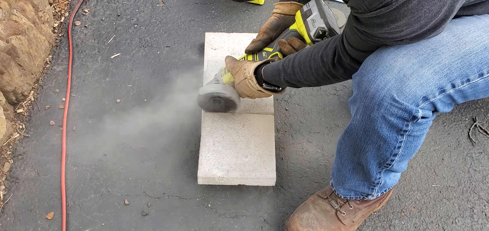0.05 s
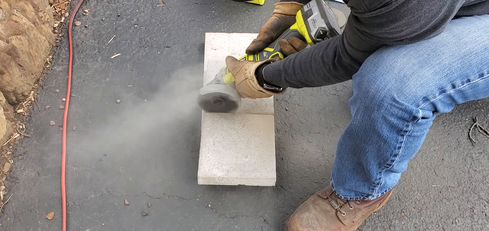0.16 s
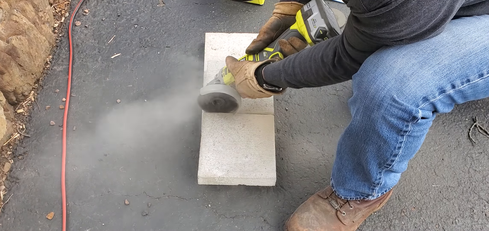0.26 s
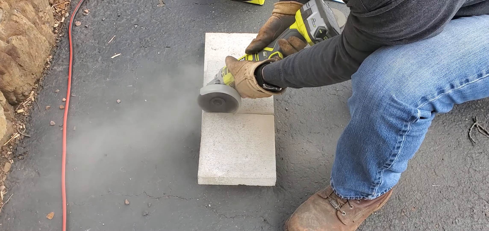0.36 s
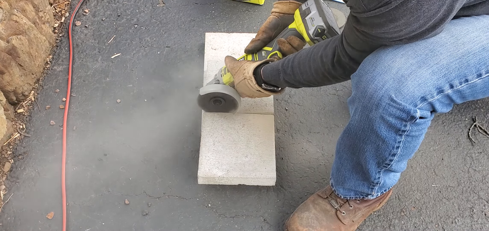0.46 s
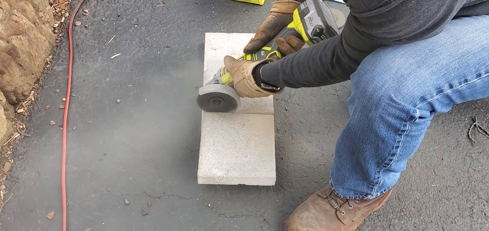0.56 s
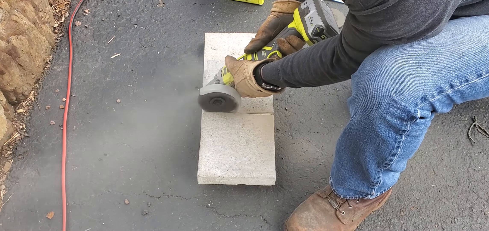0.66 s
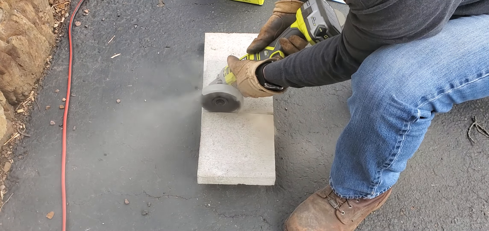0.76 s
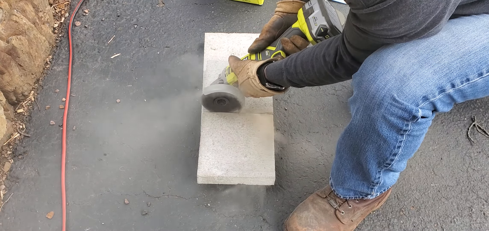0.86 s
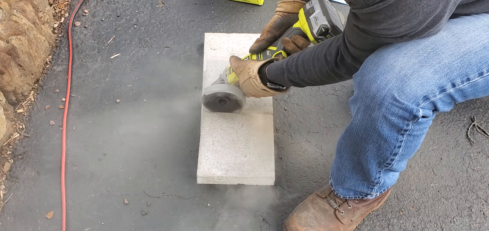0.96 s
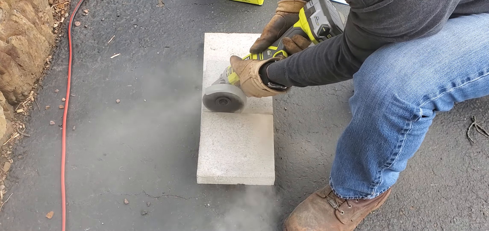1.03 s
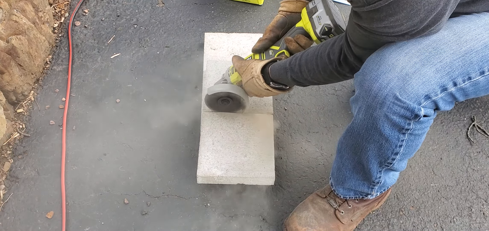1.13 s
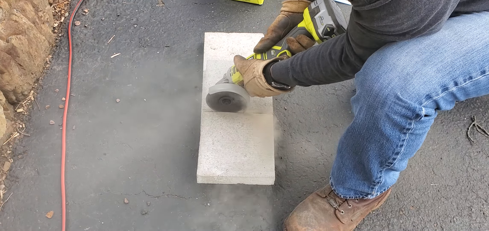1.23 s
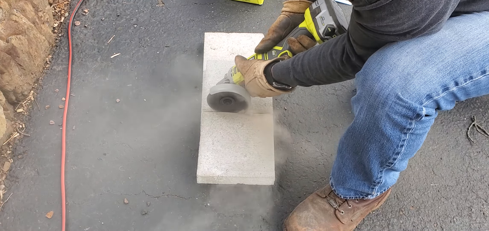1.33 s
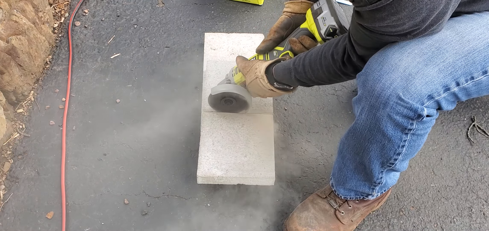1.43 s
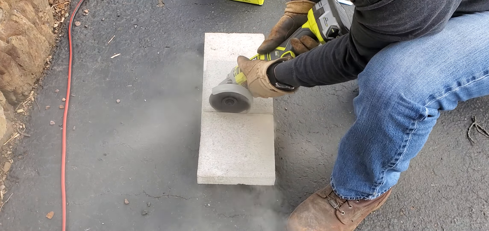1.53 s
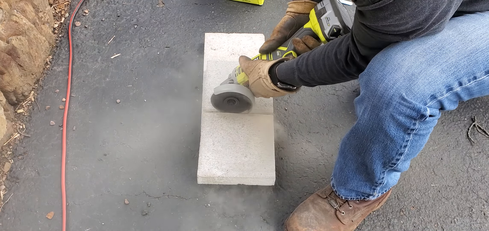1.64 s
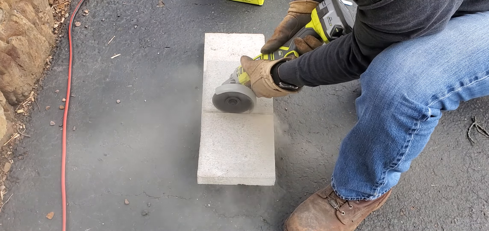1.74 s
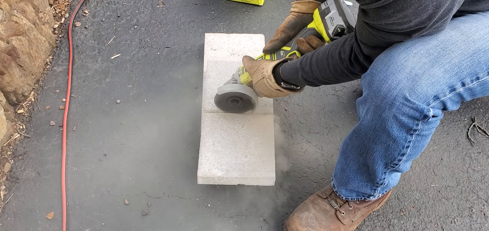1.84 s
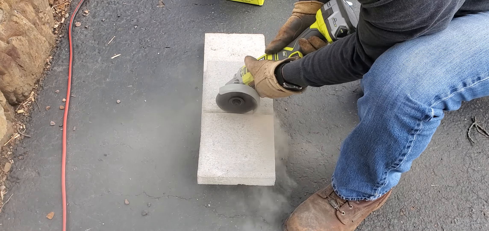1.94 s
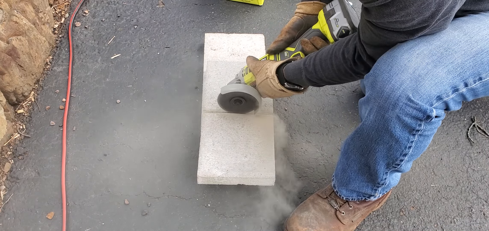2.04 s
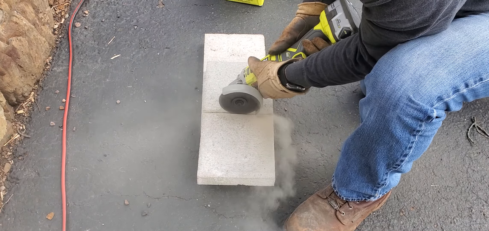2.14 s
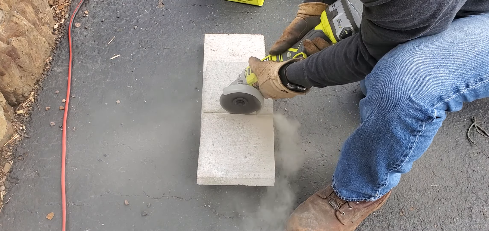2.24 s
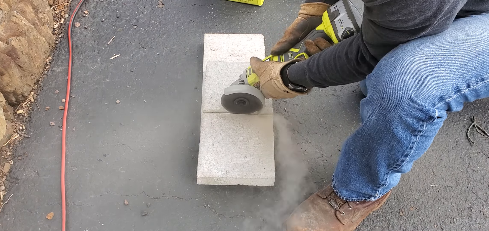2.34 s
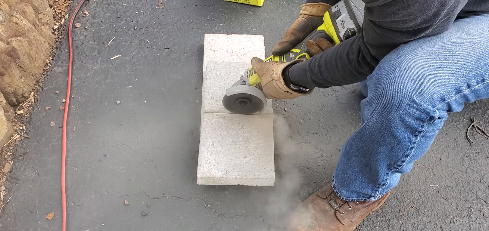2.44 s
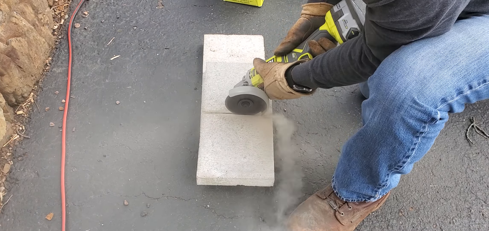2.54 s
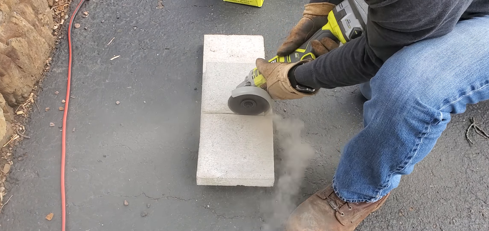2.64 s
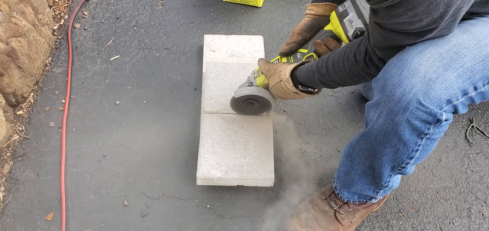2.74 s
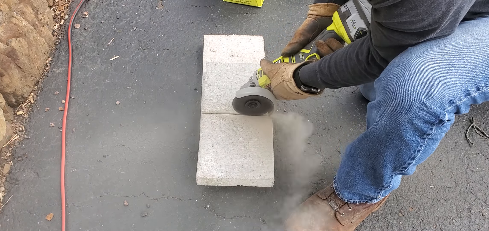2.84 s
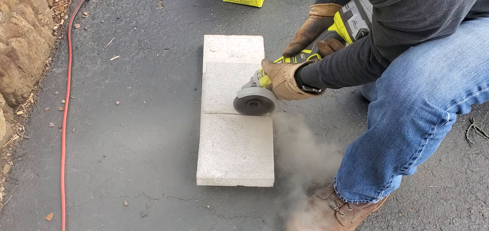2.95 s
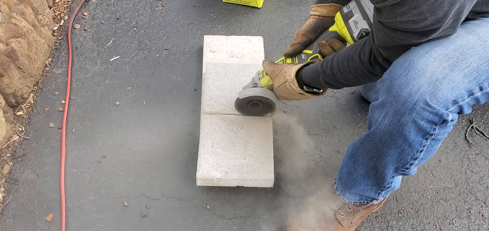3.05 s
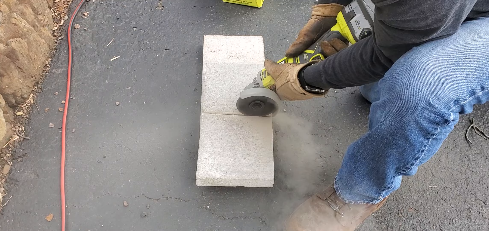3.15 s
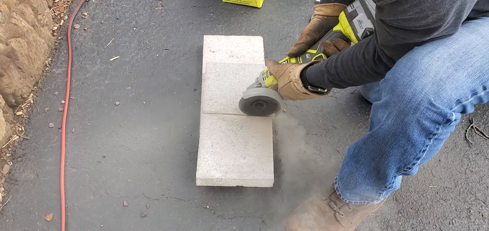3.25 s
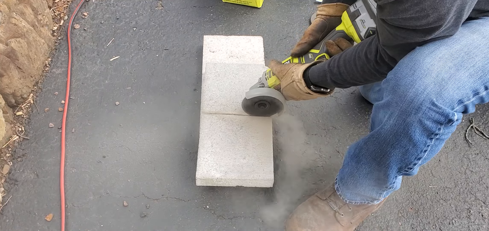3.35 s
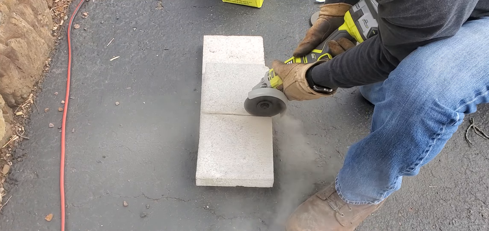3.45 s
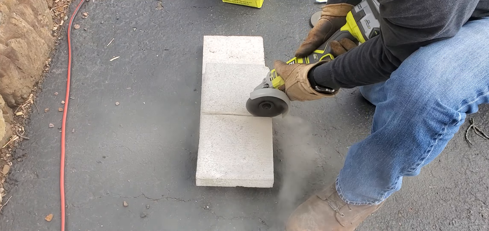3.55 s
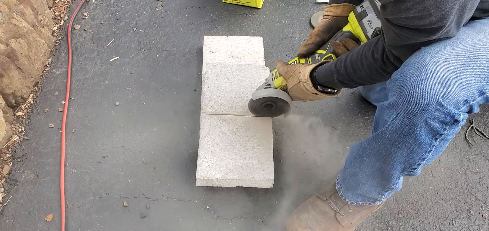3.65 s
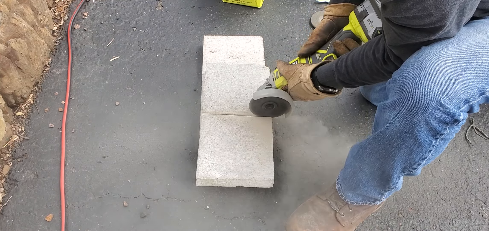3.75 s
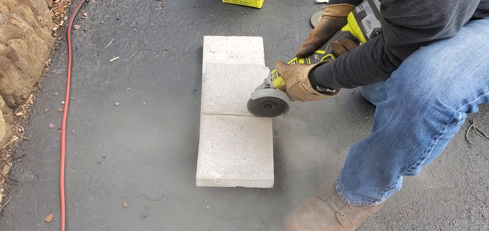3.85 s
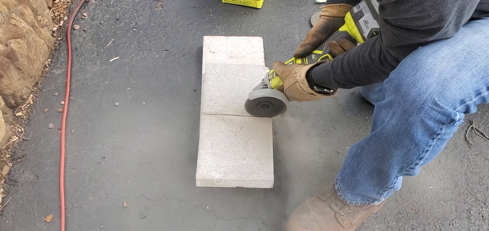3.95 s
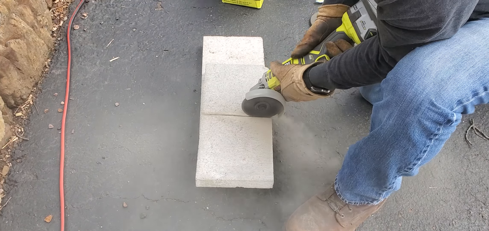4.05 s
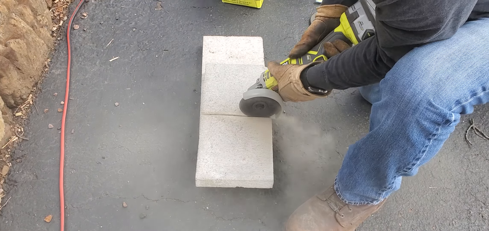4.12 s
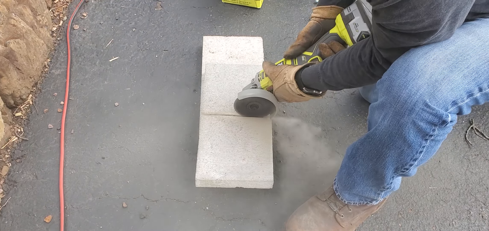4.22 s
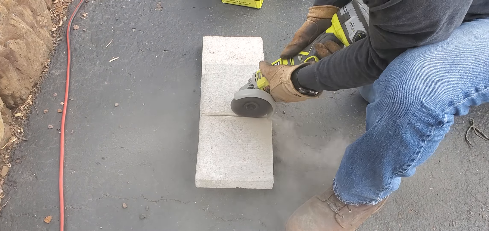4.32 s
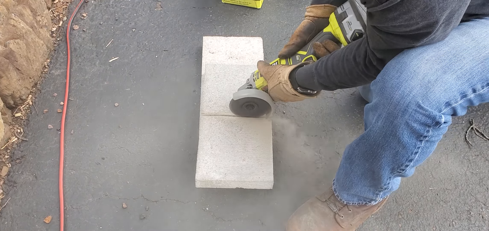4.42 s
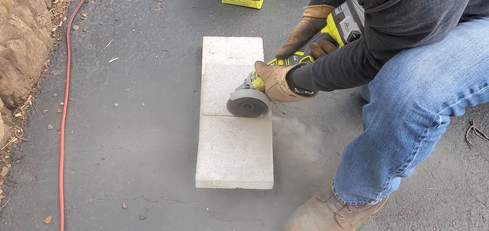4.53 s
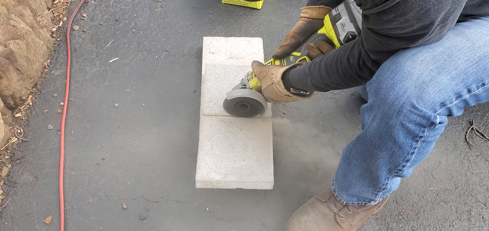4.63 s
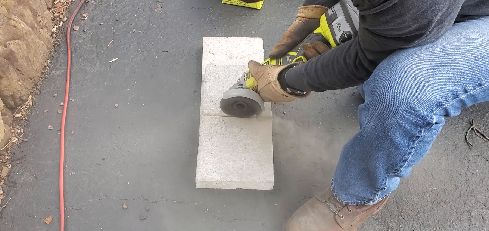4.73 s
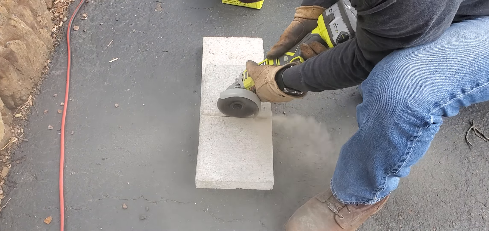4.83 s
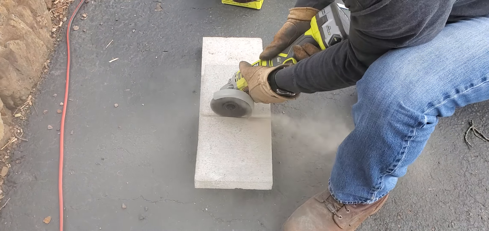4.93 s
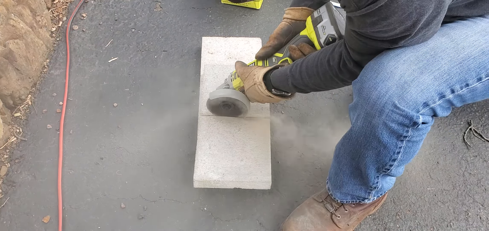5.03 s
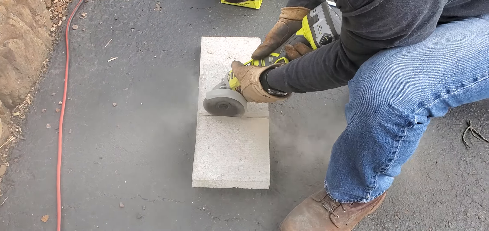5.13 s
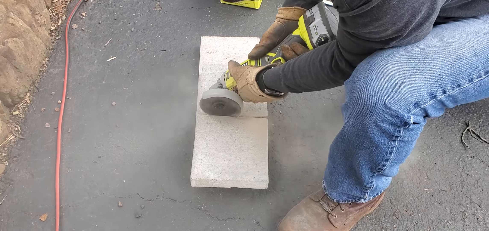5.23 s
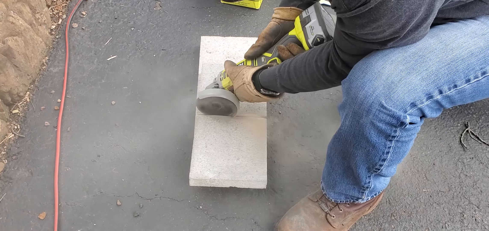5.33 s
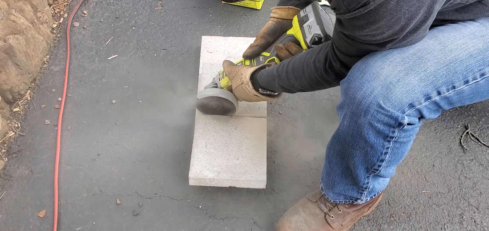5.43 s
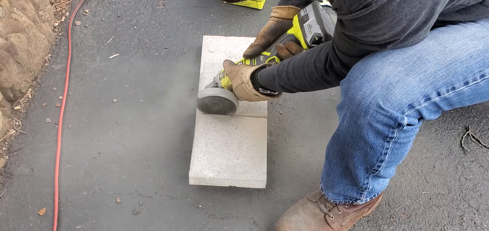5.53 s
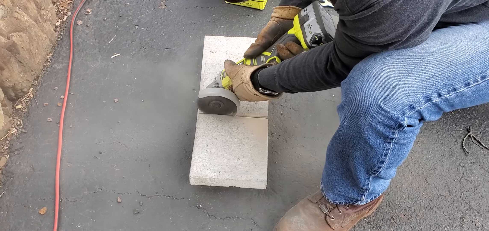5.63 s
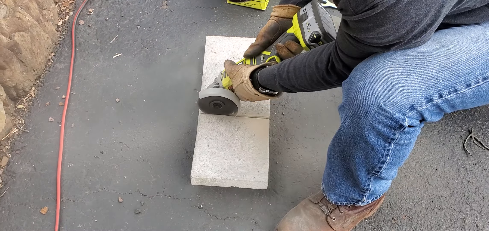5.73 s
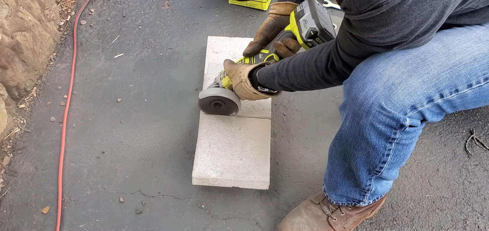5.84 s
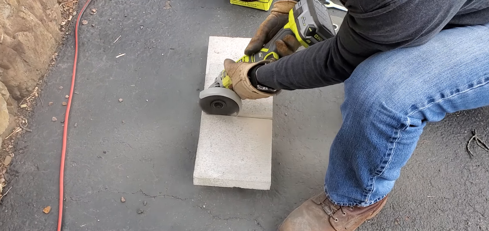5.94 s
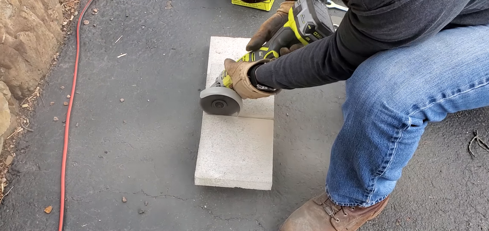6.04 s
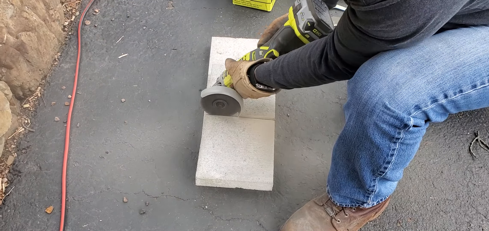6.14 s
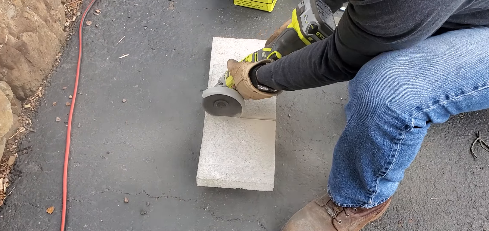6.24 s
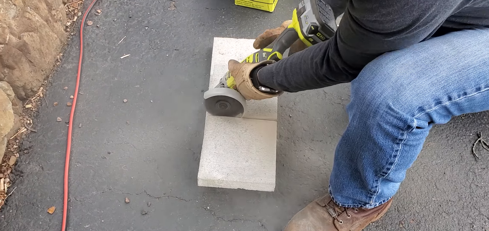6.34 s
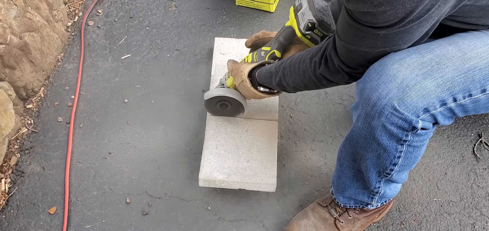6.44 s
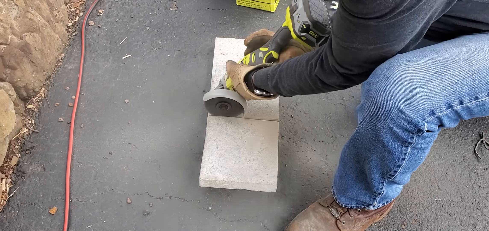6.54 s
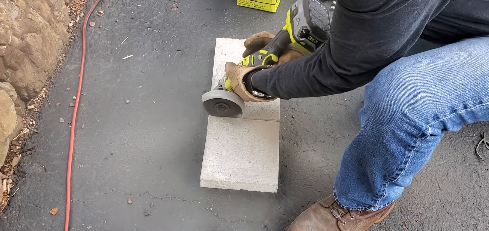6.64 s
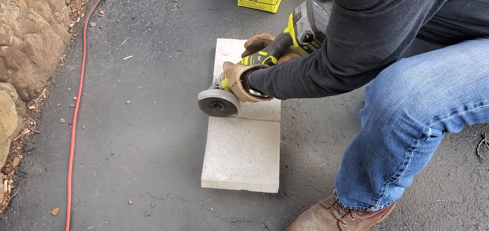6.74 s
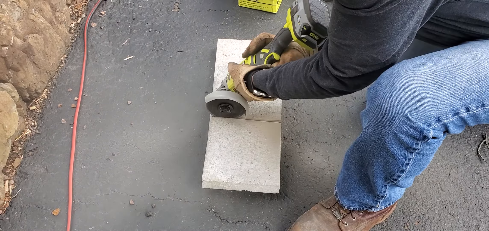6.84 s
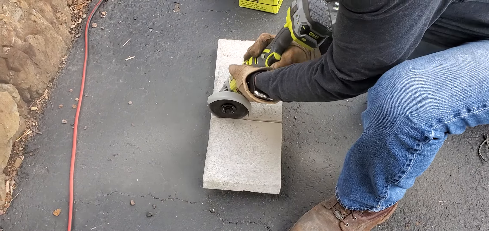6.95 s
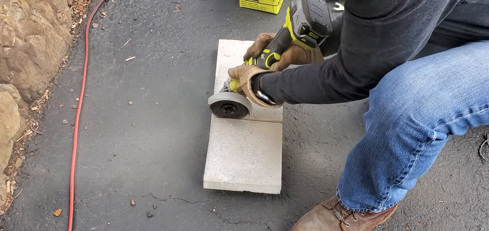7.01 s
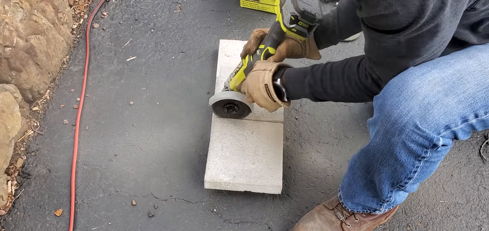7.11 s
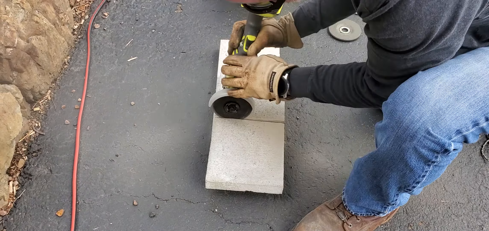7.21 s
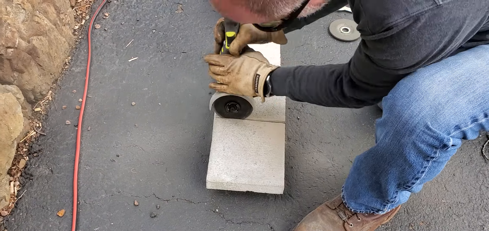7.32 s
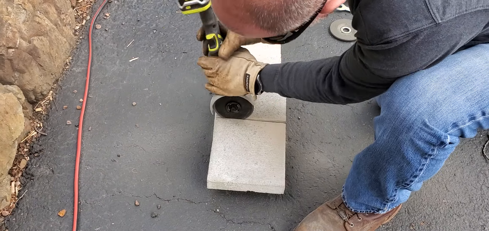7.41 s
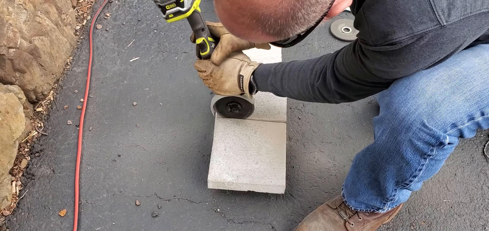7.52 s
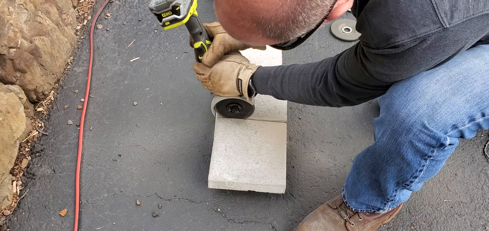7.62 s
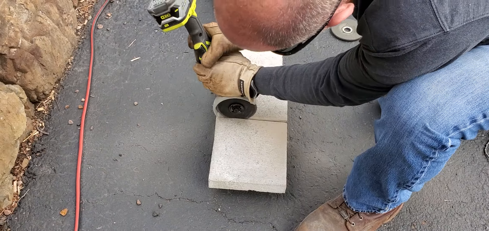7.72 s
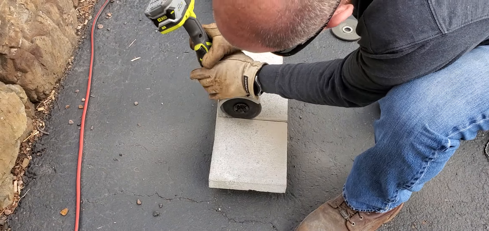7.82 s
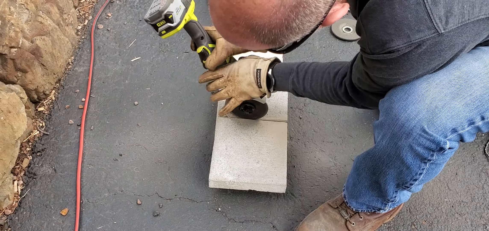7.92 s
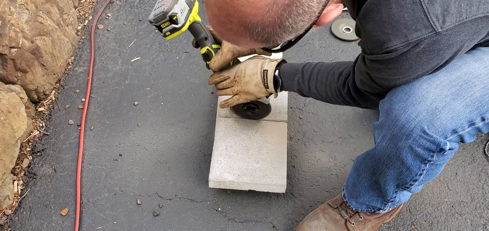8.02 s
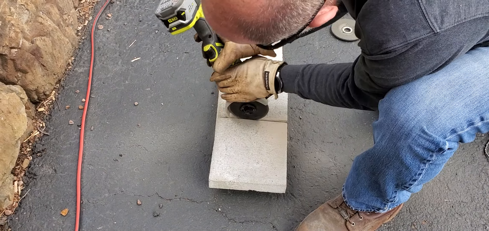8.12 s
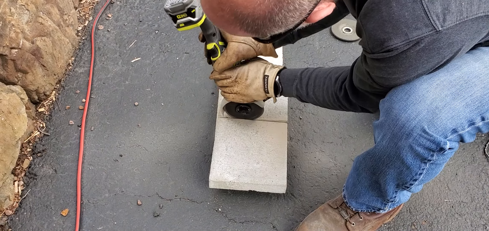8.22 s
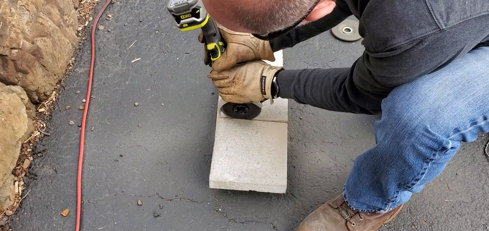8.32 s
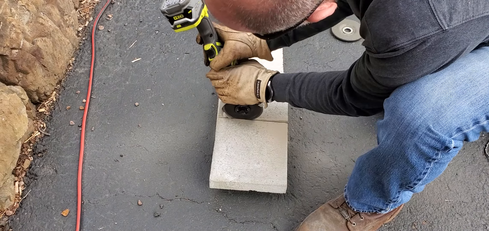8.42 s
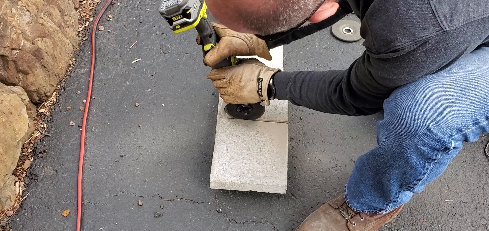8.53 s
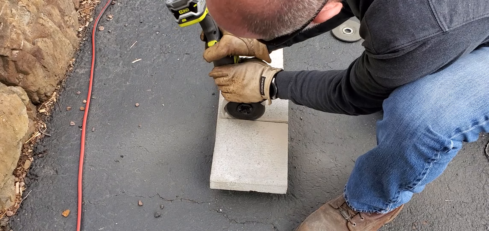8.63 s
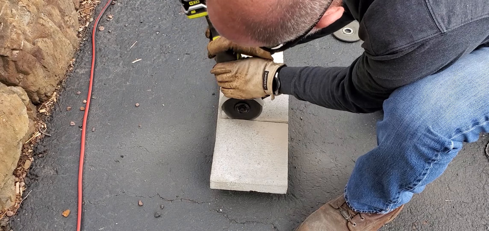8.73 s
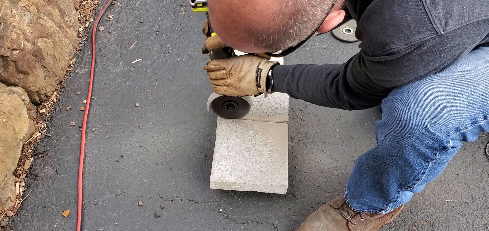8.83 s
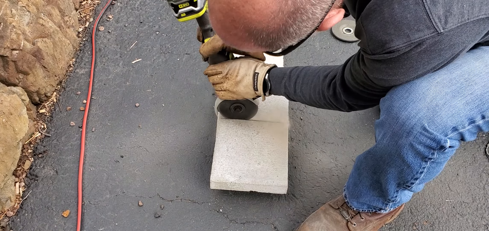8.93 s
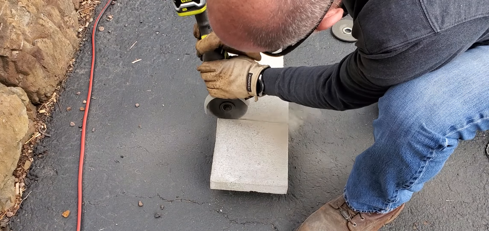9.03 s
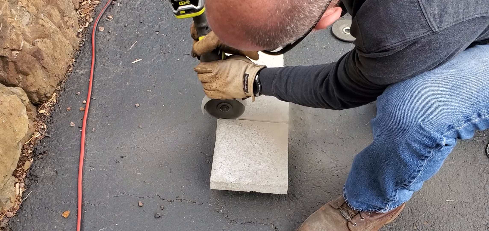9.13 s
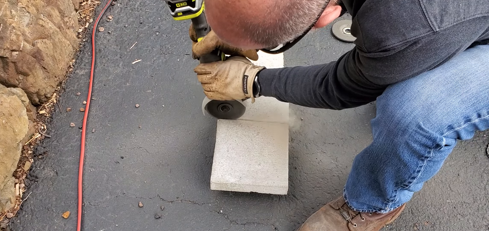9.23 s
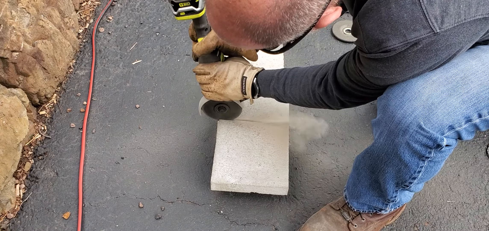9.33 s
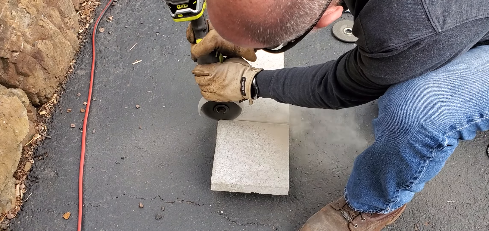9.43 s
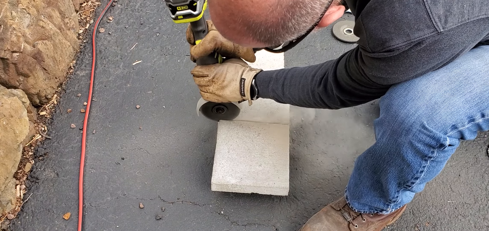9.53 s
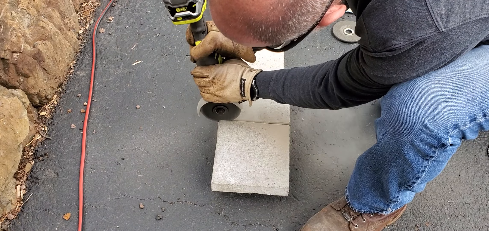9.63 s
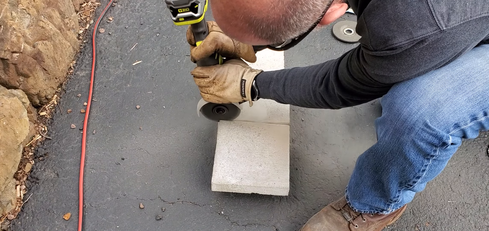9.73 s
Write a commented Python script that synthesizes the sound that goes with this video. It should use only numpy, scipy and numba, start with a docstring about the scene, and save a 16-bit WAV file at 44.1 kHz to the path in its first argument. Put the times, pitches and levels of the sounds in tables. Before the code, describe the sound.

A cordless angle grinder hisses and rings harshly against concrete outdoors, brakes to near silence with small gritty scrapes, then bites loudly again.

```python
"""A loud, hissing, ringing grind comes first: a cordless angle grinder cuts a concrete block outdoors,
a step away from a small camera. Filtered noise makes the hiss and rings, in a pattern that partly returns
each turn. Random pops make the two overloaded microphones crackle, each on its own. The grinder brakes, its
ring and echo die away, gloved hands shift it, and it starts again. In the pause, shaped noise makes the dying
ring, scrapes and rustles, and clusters of clicks make grit tick, over a low rumble of noise all through."""
import sys
import numpy as np
from scipy import signal
from scipy.fft import rfft, irfft
from scipy.io import wavfile
from scipy.ndimage import uniform_filter1d
from numba import njit

SR = 44100
rng = np.random.default_rng(int(sys.argv[2]) if len(sys.argv) > 2 else 0)


def dump(signal):
    """Clip the signal to [-1, 1] and save it as 16-bit WAV at the path in sys.argv[1]."""
    limited = np.clip(np.atleast_2d(signal).T, -1, 1)
    pcm = np.round(limited * 32767).astype(np.int16)
    wavfile.write(sys.argv[1], SR, pcm)


N = 430853


def amp(db):
    """Turns decibels into gain."""
    return 10 ** (np.asarray(db) / 20)


def unit(x):
    """Scales a sound to an average (rms) strength of 1."""
    return x / np.sqrt(np.mean(x ** 2))


def colour(x, points, size=4096):
    """Filters through (frequency [Hz], level [dB]) points without sounding early (folded cepstrum)."""
    hz, db = np.transpose(points)
    bins_hz = np.arange(size // 2 + 1) * SR / size
    curve_db = np.interp(np.log(bins_hz + 1), np.log(hz), db)
    cepstrum = irfft(np.log(amp(curve_db)))
    # folding the second half onto the first gives the causal response
    cepstrum[1:size // 2] *= 2
    cepstrum[size // 2 + 1:] = 0
    response = irfft(np.exp(rfft(cepstrum)))
    return signal.oaconvolve(x, response[None], axes=1)[:, :N]


def ring(x, modes):
    """Adds up resonances, each applied twice for dark valleys between them."""
    out = 0
    for hz, width, db in modes:
        peak = signal.iirpeak(hz, hz / width / 1.5, SR)  # wider, as two passes narrow it
        once = signal.lfilter(*peak, x)
        out = out + amp(db) * signal.lfilter(*peak, once)
    return out


@njit
def glide(x, hz, width):
    """A resonance whose centre moves every sample, on both channels."""
    y = np.empty_like(x)
    for c in range(2):
        band, low = 0., 0.
        for i in range(len(hz)):
            g = np.tan(np.pi * hz[i] / SR)
            damping = width / hz[i]
            v = (band + g * (x[c, i] - low)) / (1 + g * (g + damping))
            band = 2 * v - band
            low = low + 2 * g * v
            y[c, i] = damping * v
    return y


def walk(rate):
    """Random levels, each held 1 / rate seconds and smoothed into slopes; spread near 1."""
    hold = int(SR / rate)
    steps = np.repeat(rng.standard_normal(N // hold + 1), hold)
    return 0.92 * uniform_filter1d(steps, hold)[:N]


def curves(rows):
    """Joins the points of a table by straight lines, one curve per column after the time."""
    s, *columns = np.transpose(rows)
    return np.array([np.interp(np.arange(N) / SR, s, c) for c in columns])


def gate(s, length, attack, release):
    """Rises over the attack, holds, then dies away exponentially after the length."""
    t = np.arange(N) / SR - s
    return np.clip(t / attack, 0, 1) * np.exp(-np.maximum(t - length, 0) / release)


def pair(alike, lag=9):
    """Noise at two microphones that share a part of it, the right one later (samples) and reversed."""
    shared, left, right = rng.standard_normal((3, N))
    alike = np.clip(alike, 0, 1)
    common = np.array([shared, -np.roll(shared, lag)])
    return np.sqrt(alike) * common + np.sqrt(1 - alike) * np.array([left, right])


# The cut, before chance swings, lifts and chatter:
# (time [s], grinding level [dB], crackle level [dB], left minus right of the grinding [dB])
CUT = [(0.0, -21.5, -17, 0.5), (0.62, -20.5, -18.5, -4), (0.86, -19.5, -17, 0.0), (0.87, -22, -17, -3.5),
       (1.3, -19, -17, -2.5), (2.64, -20.5, -17.5, -1.5), (2.89, -22, -17, -4.5), (3.74, -21, -16.5, -3.5),
       (3.99, -24, -17.5, -6), (4.08, -22, -17.5, -7.5), (4.54, -22, -18.5, -3), (4.92, -21.5, -17.5, -3),
       (4.95, -19.5, -16, -1.5), (5.83, -23, -18, -3), (5.92, -20.5, -18, -5.0), (6.26, -21.5, -18.5, -2.5),
       (6.4, -18, -15.5, 0.0), (6.45, -19, -18, -3), (6.514, -24.5, -21, -5.5), (6.646, -20.5, -13.5, -1.5),
       (6.688, -26, -18, -7.5), (6.732, -17.5, -21.5, -4), (6.766, -19.5, -16.5, -2.5),
       (6.83, -23.5, -18.5, -2), (8.88, -13.5, -9.5, -3.5), (8.992, -19, -16.5, -4),
       (9.072, -16, -15.5, -0.5), (9.242, -22, -17.5, -3), (9.6, -21, -17, 0)]
# The turning disc: (time [s], speed [turns per s], share of the pattern that returns [0-1], halved on the left)
DISC = [(0, 84, .25), (.55, 98, .75), (.9, 92, .5), (1.2, 84, .25), (1.4, 82, .8), (1.85, 86, .5),
        (2.7, 81, .55), (3.1, 82, .2), (3.6, 83, .6), (3.9, 85, .35), (4.1, 87, .9), (4.9, 84, .9),
        (5.1, 82, .15), (5.4, 85, .7), (5.65, 91, .6), (5.9, 100, .95), (6.1, 101, .85), (6.25, 90, .25),
        (6.45, 80, .3), (6.52, 69, 1), (6.74, 68, .9), (6.77, 68, .3), (6.82, 66, 1), (8.87, 95, .25),
        (9.3, 84, .25), (9.77, 85, .3)]
WANDER_DB = 0.8  # chance swings of the pressure
STEADY_HAMMER = .7  # part of the returning share that bunches the crackle outside the chatters
UNLOADED_DB = -30  # the crackle all but stops without load


def grinder():
    """The disc rubs the stone and sounds by its force, which also makes the microphones crackle."""
    grind_db, crackle_db, pan_db = curves(CUT)
    hz, share = curves(DISC)
    lift_db, free = lifts()
    chatter_db, ease = chatters()
    grind_db = grind_db + lift_db + WANDER_DB * walk(7)
    crackle_db = crackle_db + chatter_db + WANDER_DB * walk(7.7)
    hammer = np.maximum(STEADY_HAMMER * share, ease)
    force, beat = contact(hz, share)
    # the disc runs out of true: the level swings once a turn, opposite to the crackle
    force = force * amp((share - 1.5) * beat + 1.2 * walk(25) + 1.6 * walk(160))
    sides_db = np.array([pan_db, -pan_db]) / 2
    disc = (hiss(force) + rings(force, hz)) * amp(grind_db + sides_db)
    pops = amp(UNLOADED_DB * free) * crackle(crackle_db, beat, hammer)
    return brake_and_restart() * (disc + pops)


def contact(hz, share, size=512):
    """Rim on stone: a roughness pattern locked to the turn that wears away slowly, plus fresh grit."""
    turns = np.cumsum(hz) / SR
    fresh_rows = rng.standard_normal((1000, size))
    # one row per turn, each much like the row before
    rows = unit(signal.lfilter([1], [1, -.89], fresh_rows, axis=0))
    rim = rows.ravel()[(turns * size).astype(int)]
    share = share * np.array([[.5], [1]])
    returning = np.sqrt(share) * np.array([rim, -np.roll(rim, 9)])
    grit = np.sqrt(1 - share) * pair(0.098)
    return returning + grit, np.cos(2 * np.pi * turns)


# Colour of the grinding hiss: (frequency [Hz], level per Hz [dB])
HISS_COLOUR = [(300, -33.5), (1070, -9.5), (2760, -4), (3720, -6), (4600, -8), (5720, -5), (9710, -10),
               (12600, -9.5), (15700, -11)]


def hiss(force):
    """Grit torn off the stone gives broad noise."""
    return unit(colour(force, HISS_COLOUR)) * amp(-1.5)  # against the grinding level


# Fixed whines and the rings of disc and guard: (frequency [Hz], width [Hz], level within its group [dB])
WHINE = [(1682, 76, -3), (1827, 130, 0.1)]
LOW_RING = [(2110, 240, -8.5), (2500, 710, 0), (2515, 120, 2)]
HIGH_RING = [(3585, 630, 0.0019)]
SCREECH = [(7600, 460, -7.5), (12200, 1900, -1.5), (13800, 2000, 0.5), (14500, 890, 4)]
# Gear line that follows the speed: (multiple of the turn, width [Hz])
GEAR = (35.6, 250)
WHINE_DB, LOW_DB, HIGH_DB, SCREECH_DB = -24, -20.5, -15.5, -6  # against the grinding level


def rings(force, hz):
    """The rubbing force shakes the metal and gears, which answer at their own pitches."""
    whine_db, low_db, high_db, screech_db = singing()
    right = np.array([[-1], [1]])  # the rings beam towards the right microphone
    multiple, width = GEAR
    gear = glide(force, multiple * hz, 1. * width)
    gear = unit(glide(gear, multiple * hz, 1. * width))
    whine = unit(ring(force, WHINE)) * amp(WHINE_DB + whine_db + 3.5 * right)
    low = unit(ring(force, LOW_RING)) * amp(LOW_DB + low_db + 3.7 * right)
    high = unit(ring(force, HIGH_RING)) * amp(-6.5) + gear * amp(-11.5)
    high = high * amp(HIGH_DB + high_db + 3.3 * right)
    screech = unit(ring(force, SCREECH)) * amp(SCREECH_DB + screech_db + 1.1 * right)
    return whine + low + high + screech


# Spells in which the disc sings:
# (time [s], length [s], then rise of whine, low ring, high ring and screech [dB])
SINGING = [(.15, 0.18, 1, 8, -2, 3.5), (.4, 0.35, 12, -1, 5, 4.5), (0.94, 0.24, 2, 11.5, 14, -6),
           (1.27, 0.19, 0.5, 9.5, -1.5, 1), (1.55, .4, 2, -6, -2, 1), (2.2, 0.97, 6, 1.5, -5, -0.5),
           (2.95, 0.52, 0.5, 4, -2, -1), (4.003, 0.41, 2.5, 7.5, 9.5, -1), (4.3, 0.63, 1, 1.5, 12.5, 0),
           (4.775, 0.21, 11, 17, 12, -4), (5.216, 0.31, 5, 11, 8, 5), (5.454, 0.41, 9, 10, 10.5, 4),
           (5.75, 0.51, 7.5, 5.5, 11, 7), (6.774, 0.11, -16, 11, 9.5, 5), (8.847, .09, 11.5, 14, 13.5, -11),
           (9.08, 0.17, 0, 9, -2, -1)]


def singing():
    """Rise in dB of each ring: smooth swells plus a chance wander."""
    t = np.arange(N) / SR
    wander_db = [2.5, 2.5, 2, 1.2]  # whine, low, high, screech
    rise_db = np.array([db * walk(9) for db in wander_db])
    for s, length, *rises in SINGING:
        swell = np.sin(np.pi * np.clip((t - s) / length, 0, 1))
        rise_db = rise_db + np.outer(rises, swell)
    return rise_db


# Colour of one overload pop: (frequency [Hz], level per Hz [dB])
POP = [(15, -49.5), (25, -21.5), (70, -11), (174, -9), (352, 2.5), (1090, -5.5), (1470, -12), (2390, -11),
       (4330, -13), (7630, -13), (9460, -16), (13800, -15), (15800, -24)]


def crackle(db, beat, share, rate=3200, full_db=-22, thin=1.2, scatter=2.5):
    """Overload pops of either sign, left and right apart; they thin with less load and bunch by the turn."""
    slack = np.maximum(full_db - db, 0)  # dB below a full load
    depth_db = 3 + 17 * share ** 2 + 1.5 * slack
    # from moment to moment the blow may fall short of the overload point on either side
    miss_db = 3 * share ** 2 * (walk(40) + np.array([walk(60), walk(60)]))
    chance = rate / SR * amp(-thin * slack + depth_db * (beat - 1))
    spread = np.minimum(rng.exponential(size=(2, N)), 2.5)
    size = amp(scatter * spread) * rng.choice([-1, 1], (2, N))
    hits = rng.random((2, N)) < chance * amp(miss_db)
    # rarer pops are made stronger to even out the level
    pops = hits * size / np.sqrt(uniform_filter1d(chance, 1500) + 1e-6)
    return unit(colour(pops, POP)) * amp(db)


# The pressure eases and the disc chatters: (time [s], length [s], change of crackle [dB])
CHATTERS = [(.4, 0.19, -1), (.72, .06, -1.5), (0.859, 0.049, -3), (0.929, 0.048, -1.5), (1.04, .06, -2),
            (3.019, 0.043, -3), (4.034, 0.037, -4), (4.32, 0.068, -3), (4.444, 0.16, -3),
            (4.68, 0.038, -1.5), (4.769, 0.058, -4.5), (4.875, 0.037, -4.5), (5.577, .06, 0.5),
            (5.724, 0.084, -2), (5.865, 0.086, -5), (6.041, 0.066, -2.5), (6.218, 0.038, -1),
            (6.476, 0.25, -2), (6.797, 0.044, -5.5)]


def chatters():
    """Crackle change in dB, and how far the easing pressure makes the disc hammer (0-1)."""
    edge_s = .012
    change_db, ease = np.zeros(N), np.zeros(N)
    for s, length, db in CHATTERS:
        spell = gate(s, length, edge_s, edge_s)
        change_db = change_db + db * spell
        ease = np.maximum(ease, spell)
    return change_db, ease


BRAKE_S, BITE_S = 6.835, 8.931  # the brake comes on; the disc bites the stone again
# The disc lifts off the stone: (time [s], length [s], change of grinding [dB])
LIFTS = [(6.507, 0.037, -2), (6.665, .058, -2.5)]


def lifts():
    """Grinding change in dB, and how free of load the disc is, in the lifts and the pause."""
    edge_s, land_s = .008, .0025
    change_db = np.zeros(N)
    free = gate(BRAKE_S, BITE_S - BRAKE_S, edge_s, land_s)
    for s, length, db in LIFTS:
        lift = gate(s, length, edge_s, land_s)
        change_db = change_db + db * lift
        free = free + lift
    return change_db, free


BRAKE_DB_PER_S3 = 70000  # the brake bites ever harder
START_S, ONSET_DB_PER_S, ONSET_DB = 8.869, 1496, -17


def brake_and_restart():
    """Gain: braked to silence, then the sound swells in steeply just before it jumps to full at START_S."""
    t = np.arange(N) / SR
    braked_db = -BRAKE_DB_PER_S3 * np.maximum(t - BRAKE_S, 0) ** 3
    swelling_db = ONSET_DB + ONSET_DB_PER_S * (t - START_S)
    return np.where(t < START_S, amp(np.maximum(braked_db, swelling_db)), 1)


# Colour of the outdoor rumble: (frequency [Hz], level per Hz [dB])
RUMBLE = [(13, -48), (22, -24.5), (64, -2.5), (118, -14.5), (151, -8), (193, -11.5), (234, -16),
          (353, -17.5), (876, -37.5), (2290, -43), (9840, -57), (15700, -53)]
# Its loudness, before a chance wander and the lean to the right: (time [s], level [dB])
OUTDOORS = [(6.95, -51.5), (7.204, -57.5), (7.662, -50.5), (8.34, -48), (8.522, -54), (8.82, -48.5)]


def outdoor_rumble():
    """Low noise, unrelated at the two microphones, that slowly swells and sinks."""
    level_db = curves(OUTDOORS)[0] + 2.6 * walk(10)
    return unit(colour(pair(0), RUMBLE)) * amp(level_db + np.array([[-1.5], [1.5]]))


def pause():
    """The disc's ring and echo die away, then it drags grit, gloves rustle, grains tick; louder on the right."""
    scrape_gain, rustle_gain, hz = pause_spells()
    sound = scraping(scrape_gain, hz) + rustling(rustle_gain) + grit_ticks()
    return sound * amp([[-2.5], [2.5]])


# Rubs, and at first the dying ring and echo of the braked disc, before the lean to the right:
# (time [s], length [s], scraping level [dB], rustle level [dB], starting resonance [Hz])
PAUSE_SPELLS = [(6.87, 0.077, -55, -60, 2200), (6.94, 0.045, -48, -52, 2250),
                (7.01, 0.057, -67.5, -62, 2500), (7.1, 0.28, -76.5, -71, 2400),
                (7.19, 0.048, -66, -60, 2470), (7.42, 0.09, -73, -68, 2100), (7.5, 0.053, -67, -62, 2060),
                (7.57, .27, -72.5, -71, 2251), (7.86, .09, -58.5, -55.5, 2450),
                (7.94, 0.16, -51, -50, 2260), (8.15, 0.027, -56, -53, 2320), (8.21, 0.013, -58, -45, 2270),
                (8.26, 0.037, -60, -64, 2050), (8.335, 0.13, -58.5, -61, 2380),
                (8.49, 0.081, -59, -56, 2300), (8.6, 0.06, -57.5, -53, 2250), (8.815, .05, -59, -70, 2020)]


def pause_spells():
    """Gain of scrape and rustle, and the resonance, which sinks early in each spell and wavers."""
    attack_s, release_s = .012, 0.021
    sag = 0.96  # share lost per second, for the first 0.15 s
    t = np.arange(N) / SR
    scrape, rustle = 0, 0
    hz = np.full(N, 1. * PAUSE_SPELLS[0][-1])
    for s, length, scrape_db, rustle_db, start_hz in PAUSE_SPELLS:
        shape = gate(s, length, attack_s, release_s)
        scrape = scrape + amp(scrape_db) * shape
        rustle = rustle + amp(rustle_db) * shape
        hz = np.where(t > s, start_hz * (1 - sag * np.minimum(t - s, .15)), hz)
    return scrape, rustle, hz * (1 + 0.046 * walk(25))


# Colour of the dragged grit: (frequency [Hz], level per Hz [dB])
SCRAPE = [(350, -53.5), (600, -12), (977, -3.5), (1200, -20.5), (1420, -11.5), (1710, -18), (2150, -6),
          (3270, -18.5), (3870, -20), (5000, -21.5), (6500, -57), (11000, -120)]
# Rings of the block, also under the ticks: (frequency [Hz], width [Hz], level [dB])
BLOCK = [(990, 69, -5.5), (1400, 150, -6), (1930, 270, -8), (2750, 78, -1), (3770, 330, -11.5)]


def scraping(gain, hz):
    """Uneven noise rings the block and one moving resonance: at first the dying disc, then dragged grit."""
    grit = pair(0.46) * amp(4.2 * walk(60) + 3.4 * walk(400))
    moving = unit(glide(glide(grit, hz, 140.), hz, 140.))
    noise = amp(-8.0) * unit(colour(grit, SCRAPE))
    return unit(noise + unit(ring(grit, BLOCK)) + moving) * gain


# Colour of the rustle: (frequency [Hz], level per Hz [dB])
RUSTLE = [(2650, -39.5), (4500, -17), (6130, -13), (6630, -7), (7470, -16), (8340, -5.5), (10200, -24),
          (11400, -4.5), (15700, -3)]


def rustling(gain):
    """Bright, uneven noise: at first the treble of the dying disc and its echo, then rubbing gloves."""
    return unit(colour(pair(0.32) * amp(5.5 * walk(90)), RUSTLE)) * gain


# Ticks of single grains, levels before the gains below:
# (time [s], click level [dB], treble against it [dB], ring [Hz])
TICKS = [(6.999, -52, -3, 2800), (7.237, -47, -9, 2500), (7.294, -57, 1, 1770), (7.586, -45, -21, 2400),
         (7.866, -38, -8, 2400), (7.947, -36, -5, 2200), (8.009, -37, -15, 2130), (8.040, -34, -7, 2110),
         (8.069, -40, -15, 1960), (8.103, -32.5, -11, 2740), (8.158, -42, -4, 2200),
         (8.184, -36, -19, 2400), (8.221, -31, -10, 2280), (8.345, -45, -16, 2180), (8.394, -48, -10, 1980),
         (8.463, -40, -20, 1960), (8.495, -49, 2, 2310), (8.540, -27, -31, 2450), (8.617, -48, -11, 2030),
         (8.843, -43, -24, 1960)]


def grit_ticks():
    """Each grain strikes with a dull click that rings block and grain, and a bright one."""
    dull = strikes([(s, amp([db] * 2)) for s, db, *_ in TICKS], .007, count=10)
    bright = strikes([(s, amp([db + treble] * 2)) for s, db, treble, _ in TICKS], 0.0095, count=24)
    s, *_, tick_hz = np.transpose(TICKS)
    own_hz = tick_hz[np.searchsorted(s[1:], np.arange(N) / SR)]  # each grain rings at its own pitch
    block = amp(18.5) * ring(dull, BLOCK)
    grain = amp(23.5) * glide(dull, own_hz, 240.0)
    treble = amp(13) * colour(bright, [(3000, -37.5), (7000, -8.0), (15000, 4.5)])
    return block + grain + treble


def strikes(rows, length, count):
    """Each event is a short cluster of clicks, unrelated left and right and densest at the start."""
    out = np.zeros((2, N))
    chance = rng.random((len(rows), 2, count, 2))
    for (s, gains), draw in zip(rows, chance):
        for side in range(2):
            places = ((s + length * draw[side, :, 0] ** 2) * SR).astype(int)
            out[side, places] += gains[side] * (2 * draw[side, :, 1] - 1)
    return out


def scene():
    """Grinder, outdoor rumble, and the sounds of the pause."""
    return grinder() + outdoor_rumble() + pause()


def record(dry):
    """The loudest peaks are rounded and everything above 15730 Hz is cut."""
    rounded = np.tanh(1.3 * dry) / 1.3
    top_cut = signal.ellip(14, .2, 110, 15730, fs=SR, output="sos")
    return signal.sosfilt(top_cut, rounded)


dry = scene()
out = record(dry)
dump(out)
```